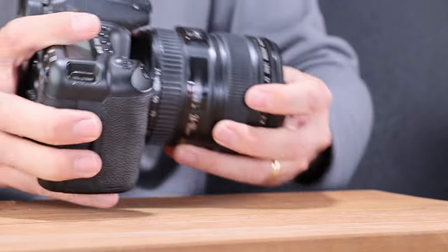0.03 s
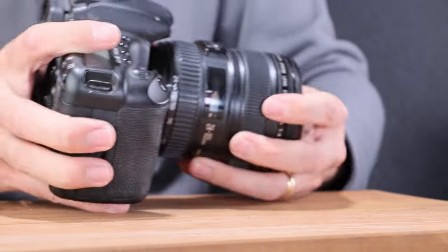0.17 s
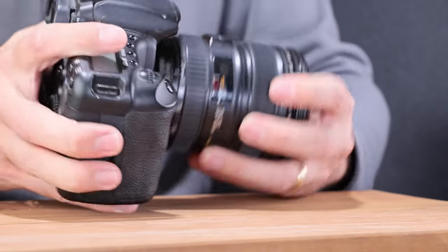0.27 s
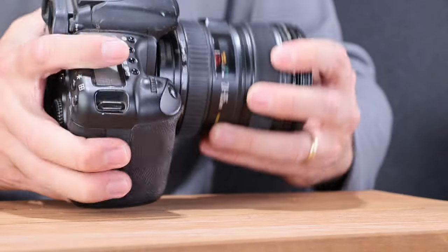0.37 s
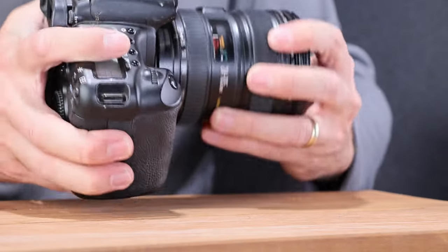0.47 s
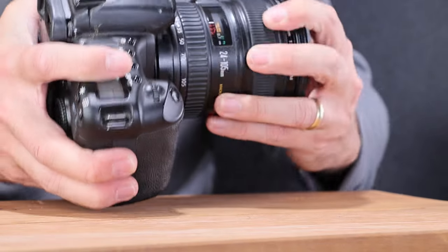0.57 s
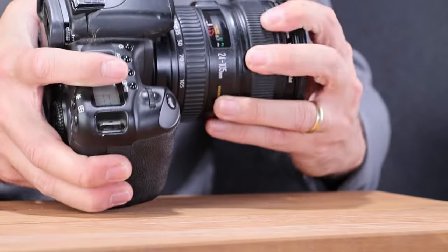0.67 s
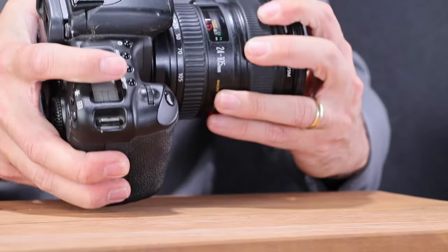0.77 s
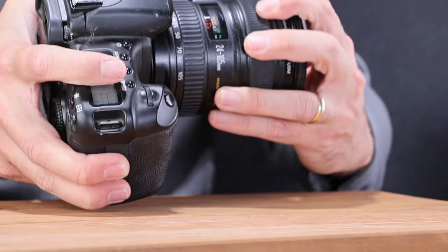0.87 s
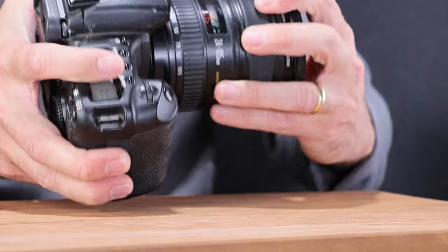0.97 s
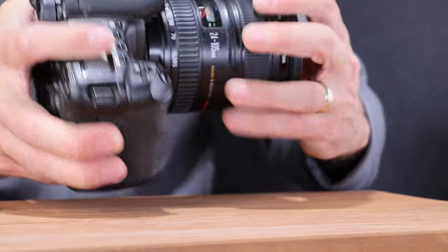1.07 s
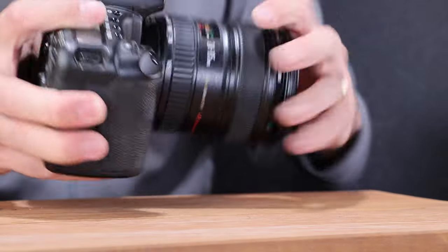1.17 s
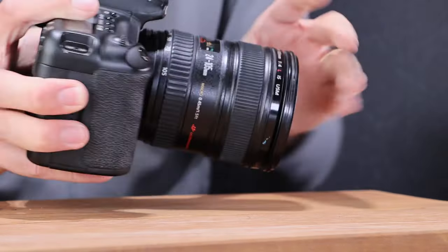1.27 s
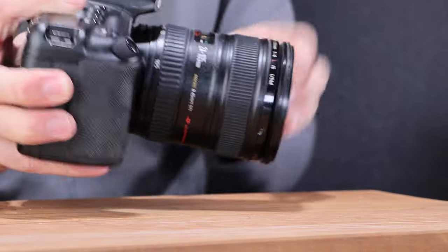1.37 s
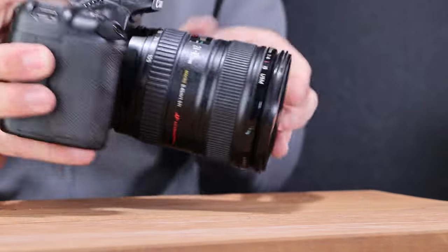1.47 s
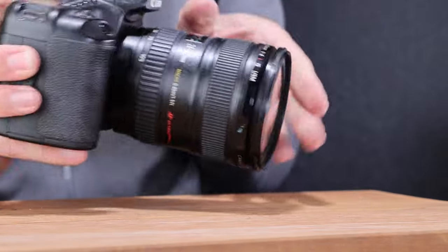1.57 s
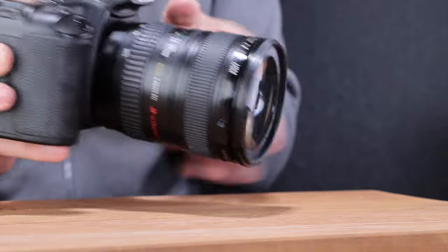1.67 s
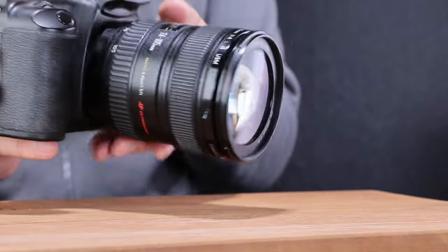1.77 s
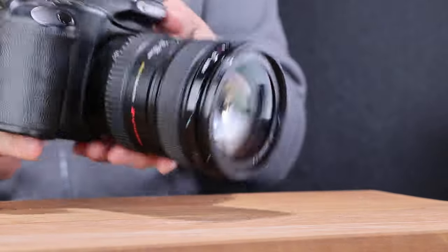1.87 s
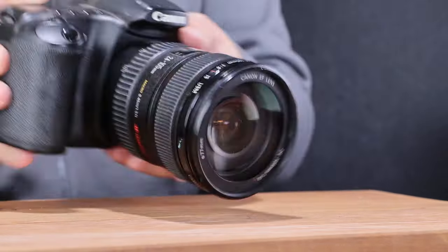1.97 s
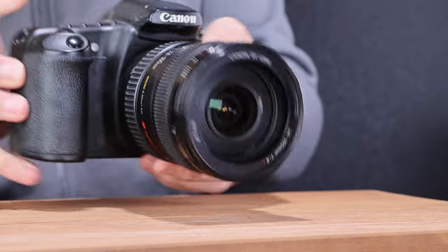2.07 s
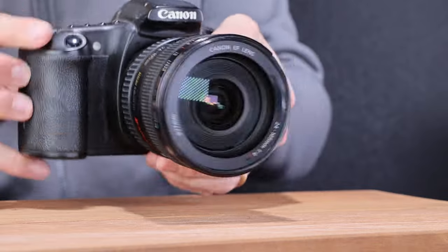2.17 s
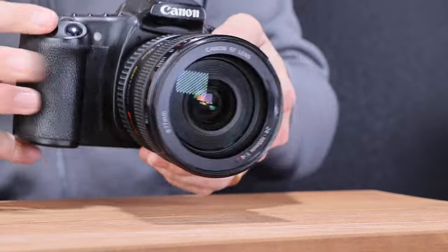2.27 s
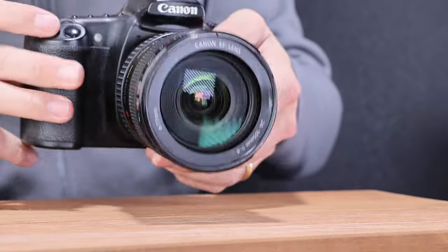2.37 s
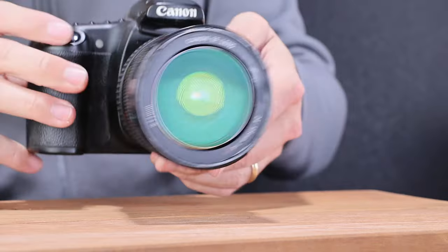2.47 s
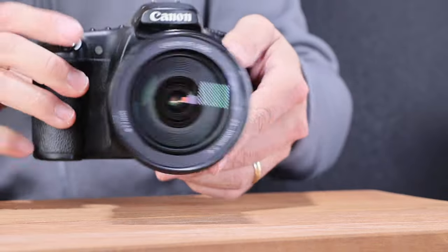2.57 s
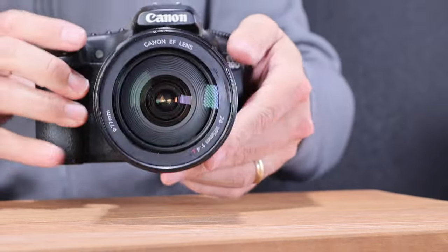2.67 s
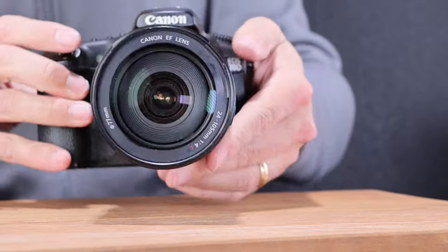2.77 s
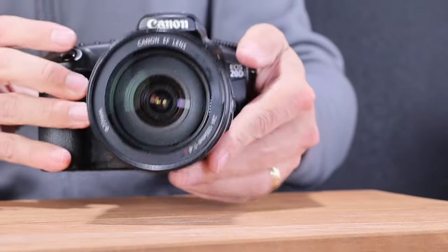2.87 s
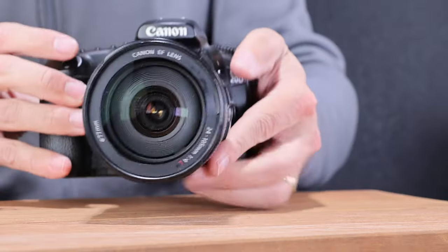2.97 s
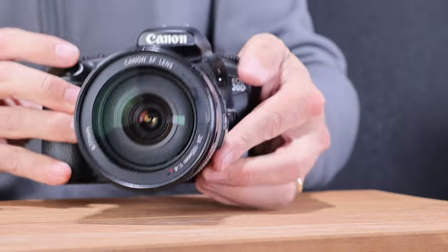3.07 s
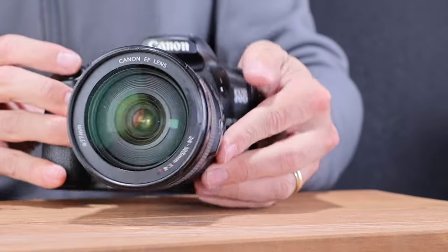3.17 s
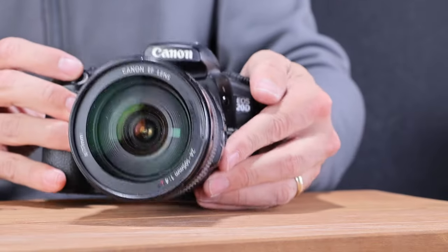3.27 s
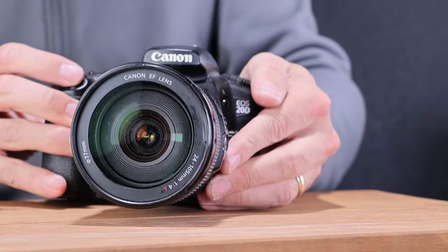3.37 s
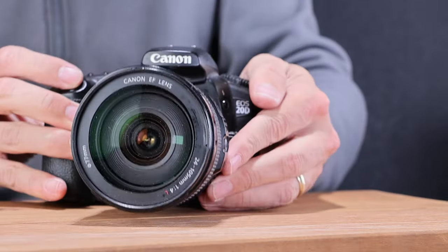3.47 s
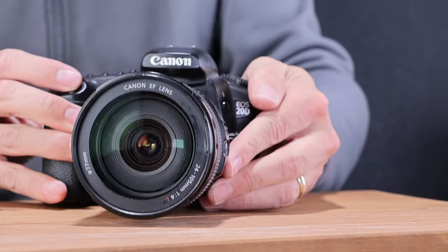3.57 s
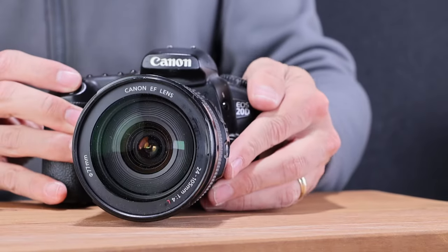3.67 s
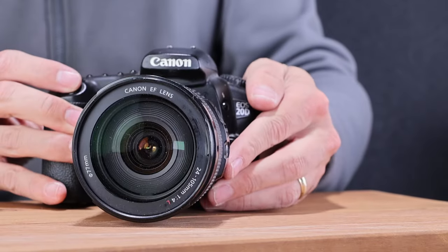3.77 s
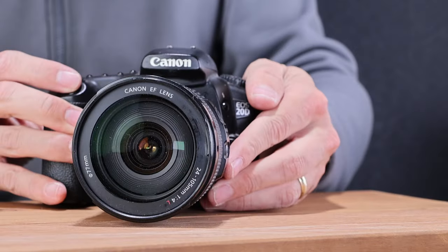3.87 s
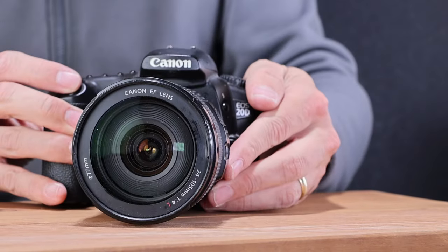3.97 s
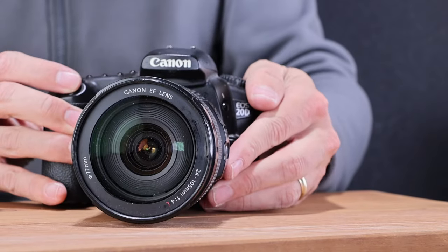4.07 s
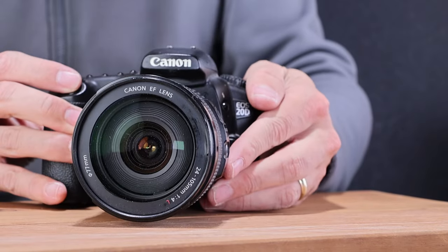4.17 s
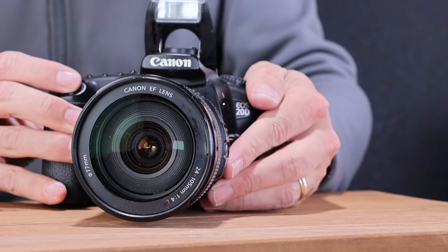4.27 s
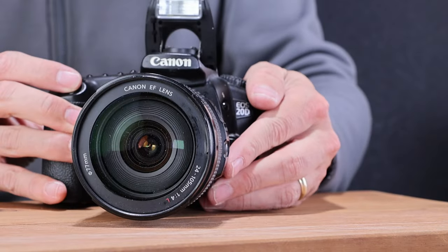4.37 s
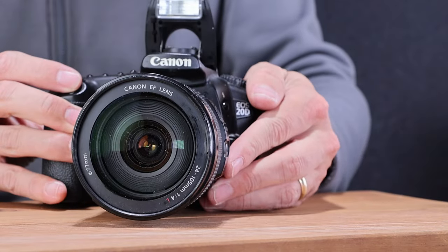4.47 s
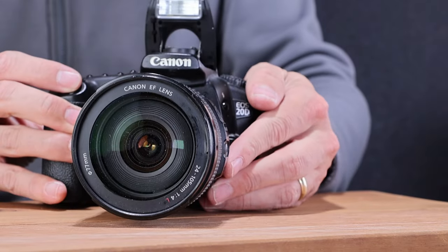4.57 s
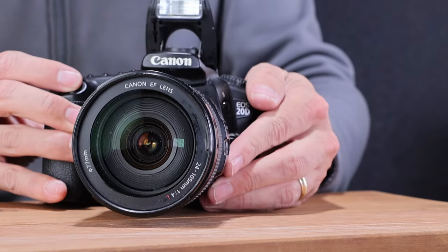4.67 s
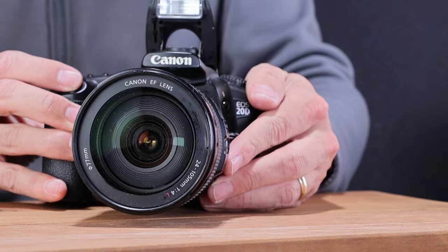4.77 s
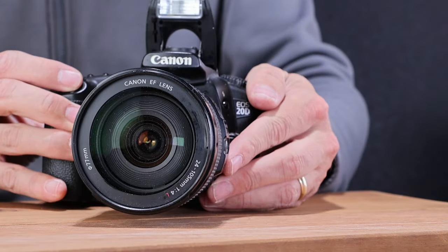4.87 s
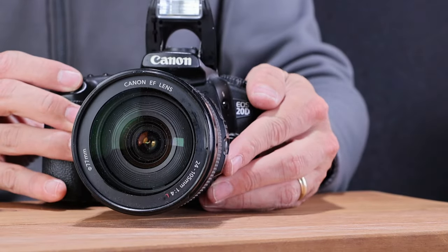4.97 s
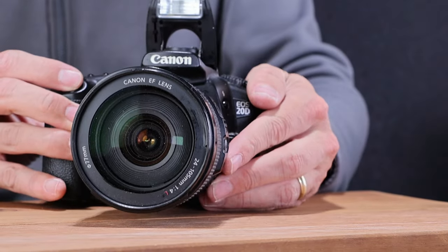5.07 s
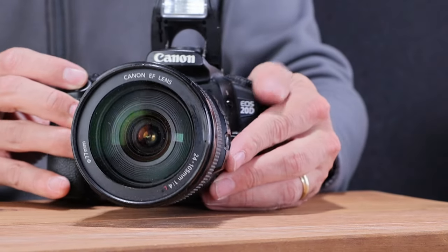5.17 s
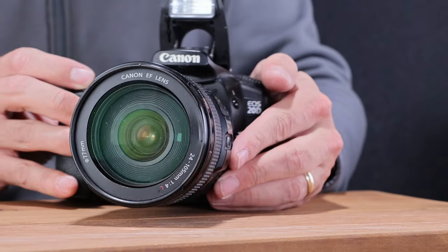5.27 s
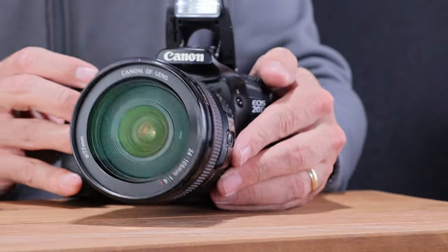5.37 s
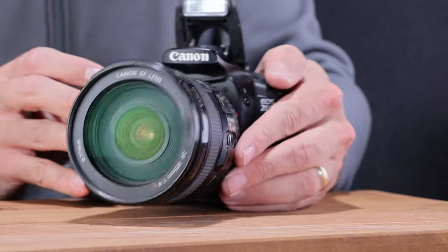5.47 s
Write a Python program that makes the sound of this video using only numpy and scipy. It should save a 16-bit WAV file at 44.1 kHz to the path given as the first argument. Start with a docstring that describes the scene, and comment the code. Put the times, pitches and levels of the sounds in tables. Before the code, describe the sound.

A lens knocks against a camera body right at the start, followed by faint ticks and rubbing as it is twisted. A soft bump comes at 0.8 seconds, and the lens locks with a crisp click at 0.9. From 1.3 to 2.5 seconds fingers rub and tick quietly on the casing, then two small, clearer clicks come around 2.7. At about 3.5 seconds the camera is set on a wooden table with two dull, low bumps. From 4.2 seconds a tiny geared motor whirrs with a thin whine, and at 4.4 the pop-up flash springs open with a sharp, briefly ringing snap, the loudest sound. A small tick follows near 4.9, then light rubbing and a soft bump around 5.4. Everything is close to the microphone in a small room with short reverberation and faint steady background noise.

```python
"""In a small room, close to a microphone, a zoom lens is twisted onto a camera until its pin snaps home.
Fingers rub by stick-slip friction and tick on the body, a switch clicks, and the camera is set down
on a wooden table, exciting low damped modes. A tiny geared motor then releases the pop-up flash,
which springs against its stop. Each impact is a brief force filtered by the resonances of the struck
part; near echoes, a short reverberation and steady room noise surround it all."""
import sys
import numpy as np
from scipy import signal
from scipy.fft import rfft, irfft
from scipy.io import wavfile
from scipy.ndimage import uniform_filter1d

SR = 44100
rng = np.random.default_rng(int(sys.argv[2]) if len(sys.argv) > 2 else 0)


def transcribe(signal):
    """Save signal, clipped to [-1, 1], as a 16-bit WAV file at the path in sys.argv[1]."""
    frames = np.atleast_2d(signal).T
    limited = np.clip(frames, -1, 1)
    pcm = np.round(limited * 32767).astype(np.int16)
    wavfile.write(sys.argv[1], SR, pcm)


N = 244112
LEAD, TAPS = 4410, 4096  # samples before t = 0, samples in an impulse response
HZ, T = np.fft.rfftfreq(TAPS, 1 / SR), np.arange(TAPS) / SR


def amp(db):
    """Amplitude ratio of a level in decibels."""
    return 10 ** (np.asarray(db) / 20)

def unit_rms(x):
    """Normalisation to unit mean power."""
    return x / np.sqrt(np.mean(x ** 2) + 1e-20)

def curve(points, hz):
    """Interpolation on a logarithmic frequency axis."""
    f, value = np.transpose(points)
    return np.interp(np.log(hz + 1), np.log(f + 1), value)

def peaks(resonances, hz):
    """Resonance: bell-shaped peaks on a dB spectrum."""
    return sum(db / (1 + (2 * (hz - f) / width) ** 2) for f, width, db in resonances)

def band_db(spectrum, bins):
    """Level of the power averaged over neighbouring bins."""
    return 10 * np.log10(abs(uniform_filter1d(abs(spectrum) ** 2, size=bins)) + 1e-12)

def part(hz, peak_db, cutoff_hz, octaves=.35):
    """A small part's broad resonance in dB, low-passed by the softness of the contact."""
    ring_db = peak_db / (1 + (np.log2((HZ + 1) / hz) / octaves) ** 2)
    return ring_db - np.minimum(10 * np.log10(1 + (HZ / cutoff_hz) ** 8), 70)

def add(mix, s, sound):
    """Superposition of a sound starting at s seconds."""
    span = mix[..., LEAD + round(s * SR):][..., :sound.shape[-1]]
    span += sound[..., :span.shape[-1]]

def ringing(db):
    """Minimum-phase impulse response of a dB spectrum."""
    log_gain = np.log(amp(np.r_[db, db[-2:0:-1]]))
    return np.fft.ifft(np.exp(np.conj(signal.hilbert(log_gain)))).real

def strike(db, chatter_s):
    """Impact excitation: decaying chatter rings a part. Rows: direct sound, all other directions."""
    blur = .74 * np.clip(HZ / 1500 - 1, 0, 1)  # summing over directions smooths the treble
    scattered_db = db + blur * (band_db(amp(db), 241) - db)
    rows = []
    for tone_db, decay_s, bins in (db, chatter_s, 55), (scattered_db, chatter_s + .002, 7):
        force = rfft(rng.standard_normal(TAPS) * np.exp(-T / decay_s))
        response = rfft(ringing(tone_db - band_db(force, bins)))
        rows.append(unit_rms(irfft(force * response)))
    return np.array(rows) * np.sqrt(.004 * SR / TAPS)  # the energy of 4 ms at unit rms

def grit(db, per_s, spread_db, size):
    """Shot noise: tiny random slips of uneven size ring a surface."""
    sizes = amp(spread_db * np.minimum(rng.exponential(1, size), 4))
    slips = sizes * rng.standard_normal(size) * (rng.random(size) < per_s / SR)
    return unit_rms(signal.oaconvolve(slips, ringing(db))[:size])


# Spectrum of the room's noise: f/Hz, level/dB
AIR = [(15, -54), (25, -14.5), (64, -8.5), (86, -18.5), (104, -9.5), (183, -7.5), (260, -7), (340, -11.5),
       (523, -9), (582, -4.5), (1240, -17.5), (1490, -18), (3830, -26.5), (6380, -27), (15500, -30.5)]
# Peaks in that noise: f/Hz, bandwidth/Hz, gain/dB
DRONE = [(217, 88, 3), (346, 64, 8.5), (673, 57, 3.5), (6200, 240, 4)]

def air():
    """Stationary noise: a low drone, coherent in both channels, and a faint hiss in antiphase."""
    hz = np.fft.rfftfreq(N, 1 / SR)
    gain = amp(curve(AIR, hz) + peaks(DRONE, hz))
    mid, side = unit_rms(irfft(rfft(rng.standard_normal((2, N))) * gain, N))
    side = amp(-21) * side + amp(-11) * rng.standard_normal(N)
    return amp(-62.5) * np.array([mid + side, mid - side])


# Reverberation time before the tail is tapered: f/Hz, T60/s
ROOM_T60 = [(150, 0.46), (400, 0.26), (1000, 0.35), (2800, 0.39), (7000, 0.37), (14000, 0.3)]
# Spectrum of the diffuse field: f/Hz, level/dB
ROOM_TONE = [(100, -0.5), (250, 1), (700, 0), (2000, 1), (5000, -3), (9000, -3.5), (15000, -5)]
# Reflections from table and walls: delay/s, relative level/dB
ECHOES = [(.0021, -19), (.0042, -11.5), (.0088, -26), (0.0097, -16), (0.0164, -17.5), (0.0216, -16.5)]

def room(x, wet_db, echo_db, build_s=.0027, side_db=-20):
    """Reflection and reverberation: row 0 arrives directly and by echoes, row 1 feeds a diffuse tail."""
    size = SR * 3 // 4
    hz, t, noise = signal.stft(rng.standard_normal((2, size)), SR, nperseg=256)
    decaying = noise * amp(-60 * t / curve(ROOM_T60, hz)[:, None])
    spectra = rfft(signal.istft(decaying, SR, nperseg=256)[1][:, :size])
    spectra /= np.sqrt(uniform_filter1d(abs(spectra) ** 2, size=61))  # evenly spread room modes
    tails = irfft(spectra * amp(curve(ROOM_TONE, np.fft.rfftfreq(size, 1 / SR))), size)
    tails *= 1 - np.exp(-np.arange(size) / SR / build_s)
    tails *= np.linspace(1, 0, size) ** 4
    tails /= np.linalg.norm(tails[0])
    mid, side = amp(wet_db) * signal.fftconvolve(x[1:], tails, axes=1)[:, :N + LEAD]
    mid += x[0]
    for delay, db in ECHOES:
        mid += amp(db + echo_db) * np.roll(x[0], round(delay * SR))
    return np.array([mid + amp(side_db) * side, mid - amp(side_db) * side])[:, LEAD:]


# Strokes of fingers and lens: t/s at the peak, swell/s, level/dB, resonance f/Hz
RUBS = [(.45, 0.07, -63, 4100), (.665, .052, -63, 3720), (1.535, .04, -60, 5830), (2.014, 0.039, -63, 5270),
        (2.063, .01, -55, 4900), (2.125, 0.067, -65.5, 5130), (2.66, 0.048, -70.5, 4800),
        (3.71, 0.022, -62.5, 668), (4.06, 0.037, -68.5, 3000), (5.38, 0.083, -68, 2800),
        (5.535, .03, -63, 2200)]
# Spectrum of the friction: f/Hz, level/dB
RUB_TONE = [(100, -35.5), (400, 5), (1200, 6), (2200, -2), (3500, -1.5), (6000, -2), (9000, -4.5),
            (12500, -0.5), (16000, -11)]

def rubs(catch_db=-3, ribs=8):
    """Stick-slip friction: skin and plastic slide, catching on ribs that each ring at their own pitch."""
    out, t = np.zeros(N + LEAD), np.arange(SR // 2) / SR - .25
    for s, swell_s, db, hz in RUBS:
        squeak_db = 3.5 + 17 * np.exp(-swell_s / .023)  # quick strokes ring out more
        tone_db = curve(RUB_TONE, HZ) + part(hz, squeak_db, cutoff_hz=2.25 * hz)
        slide = grit(tone_db, per_s=3500, spread_db=1.5, size=len(t))
        ribs_hz = hz * np.geomspace(.7, 1.6, ribs) * rng.uniform(.93, 1.1, ribs)
        catches = sum(grit(tone_db + peaks([(f, f / 6, 20)], HZ), per_s=90, spread_db=2, size=len(t))
                      for f in ribs_hz)
        stroke = unit_rms(slide + amp(catch_db) * unit_rms(catches))
        envelope = np.exp(-(t / np.where(t < 0, swell_s, 1.07 * swell_s)) ** 2)
        add(out, s + t[0], amp(db) * envelope * stroke)
    return out


# Response of the camera's shell: f/Hz, level/dB
SHELL = [(60, -30.5), (200, -10.5), (450, -1.5), (850, -3.5), (1100, -3.5), (1400, -2), (1750, -5.5),
         (2300, -4), (2800, -2.5), (3800, -4.5), (4500, -0.5), (6300, -2), (9500, -1), (16000, 0)]
# Narrow modes of the shell: f/Hz, bandwidth/Hz, gain/dB
SHELL_MODES = [(1050, 180, 4.5), (2210, 100, 4.5), (2720, 200, 1.5), (3490, 220, 4.5), (4580, 250, 1.5),
               (5200, 250, 0.5), (6200, 330, 2)]
# Response of the body's cavity: f/Hz, level/dB
CAVITY = [(150, -21), (380, -17.5), (560, -3.5), (680, 2), (900, -19.5), (1500, -28), (16000, -70)]
# Finger and switch clicks: t/s, level/dB, resonance f/Hz, cutoff f/Hz, chatter decay/s,
# cavity level/dB relative to the click
CLICKS = [(.158, -58, 5000, 11000, 0.0094, -35), (.245, -58.5, 3500, 9000, .005, -36),
          (0.4859, -50.5, 3900, 6940, 0.0023, -35), (.8, -46.5, 940, 3980, .002, -19),
          (1.2828, -52.5, 1660, 2280, .0024, -35), (1.4894, -49.5, 6660, 13200, .0017, -2.5),
          (1.5525, -53, 5200, 10000, 0.0025, -34), (1.777, -59.5, 3320, 9500, .0028, -30),
          (1.903, -56.5, 1900, 4000, .002, 3.5), (2.3938, -53, 2940, 4960, 0.00086, -35),
          (2.4597, -59, 5300, 7440, 0.0022, 4.5), (2.6871, -41, 6230, 8100, .0028, -4.5),
          (2.7423, -42.5, 2580, 7160, 0.0012, -11), (3.732, -50, 3260, 10500, .003, -11),
          (4.9474, -47.5, 5060, 6220, .0004, -40), (5.3639, -56, 3630, 7050, 0.0058, -29)]

def clicks():
    """Structural and cavity resonance: each click rings its own part, the shell and the hollow body."""
    out, shell_db = np.zeros((2, N + LEAD)), curve(SHELL, HZ) + peaks(SHELL_MODES, HZ)
    for s, db, hz, cutoff_hz, chatter_s, cavity_db in CLICKS:
        cavity = amp(cavity_db) * strike(curve(CAVITY, HZ), chatter_s=.0047)
        shell = strike(shell_db + part(hz, 8, cutoff_hz), chatter_s)
        add(out, s, amp(db) * (shell + cavity))
    return out


# Soft blows through table and body: t/s, level/dB, mean f/Hz
BUMPS = [(.807, -37.5, 145), (2.186, -49, 141), (3.4584, -33.5, 195), (3.58, -37, 178), (5.414, -48.5, 179)]
# Modes of a blow: frequency ratio, relative level/dB
WOOD_MODES = [(.55, -17), (1, 1.5), (1.4, -6.5), (2.3, -18.5)]

def bumps(rock_s=.028, loss_db=4, detune=.11, contacts=3, rise_s=.0013):
    """Damped modal vibration: the camera lands with a dull tap and rocks to rest, weaker each contact."""
    out, t = np.zeros(N + LEAD), np.arange(SR // 2) / SR
    decay_db = -60 * t / .072  # at frequency ratio 1; higher modes die sooner
    for s, db, hz in BUMPS:
        tap = strike(curve(SHELL, HZ) + part(310, 20, 760), chatter_s=.002)[0]
        add(out, s, amp(db - 12.5) * tap)
        for contact, pitch in enumerate(hz * (1 + detune * rng.standard_normal(contacts))):
            modes = sum(amp(mode_db + decay_db * np.sqrt(ratio)) * np.sin(2 * np.pi * pitch * ratio * t)
                        for ratio, mode_db in WOOD_MODES)
            add(out, s + contact * rock_s, amp(db - contact * loss_db) * modes * (1 - np.exp(-t / rise_s)))
    radiation = signal.butter(2, 75, "highpass", fs=SR, output="sos")  # little deep bass is radiated
    return signal.sosfilt(radiation, out)


# Spectrum of the gear noise: f/Hz, level/dB
GEARS = [(120, -37.5), (200, -3.5), (350, -14.5), (397, -35.5), (671, -3), (1040, -5), (1130, -6.5),
         (1540, 1), (2020, -13.5), (2550, 0), (3230, -5), (4010, -2.5), (5070, -7), (10500, -16),
         (15000, -31.5)]
# Resonances of gear housing and hinge: f/Hz, bandwidth/Hz, gain/dB
HOUSING = [(1270, 120, 8.5), (2541, 110, 3.5), (2800, 110, 4.5), (4800, 200, 4.5), (7300, 250, 3.5),
           (9250, 400, 4.5), (11900, 500, 7)]

def motor(whine_hz=3950, waver=.0027, tooth_hz=566, tooth_depth=.42):
    """Amplitude modulation by meshing teeth: a whirr with a thin whine, surging at each change of load."""
    start_s, load_s, release_s = 4.16, 4.2425, 4.3432  # runs free, cam loads the catch, arm swings
    stop_s = ARM_IMPACTS[0][0]
    t = (np.arange(N + LEAD) - LEAD) / SR
    ticks, effort = np.zeros((2, N + LEAD)), np.zeros(N + LEAD)
    for start, end, db in (start_s, load_s, -61), (load_s, release_s, -54), (release_s, stop_s, -51.5):
        stage = (t >= start) & (t < end)
        surge_db = 9 * np.exp(-(t[stage] - start) / .024)
        effort[stage] = amp(db + surge_db)
        add(ticks, start, amp(db + 5.5) * strike(curve(SHELL, HZ) + part(9000, 2, 11000), chatter_s=.005))
    speed = 1 + waver * unit_rms(uniform_filter1d(rng.standard_normal(N + LEAD), size=300))
    phase_per_hz = 2 * np.pi * np.cumsum(speed) / SR
    whine = unit_rms(np.sin(whine_hz * phase_per_hz) + amp(-23) * np.sin(3 * whine_hz * phase_per_hz))
    whine *= np.clip((t - 4.214) / .006, 0, 1)
    whine *= amp(-420.5 * np.maximum(t - release_s, 0))  # fades once the catch lets go
    gears = grit(curve(GEARS, HZ) + peaks(HOUSING, HZ), per_s=4000, spread_db=1, size=N + LEAD)
    whirr = effort * gears * (1 + tooth_depth * np.sin(tooth_hz * phase_per_hz))
    return ticks + whirr + amp([[-53.5], [-66]]) * whine  # the whine beams toward the microphone


# Response of the lens knocking on the body: f/Hz, level/dB
KNOCK = [(35, -56.5), (60, -34), (187, -5), (394, -6.5), (475, -4.5), (756, 0), (869, -5), (1350, -3.5),
         (1590, -12), (2590, -11), (2910, -12.5), (3580, -7.5), (5710, -11), (13200, -21), (15500, -36)]
# Modes of that knock: f/Hz, bandwidth/Hz, gain/dB
KNOCK_MODES = [(85, 46, 8), (318, 54, 8), (1105, 55, 0), (3480, 210, 4.5)]
# Response of the lens mount to its pin: f/Hz, level/dB
MOUNT = [(150, -29), (400, -10), (600, -7.5), (950, -16), (1400, -9.5), (1850, -21), (3100, -3),
         (3700, -9.5), (4300, 3), (5700, -0.5), (7500, -14), (10500, -11), (12500, -19), (16000, -17)]

def lens():
    """Impact excitation: the lens knocks on the body; later its sprung pin snaps home and rattles."""
    out = np.zeros((2, N + LEAD))
    add(out, -.02, amp(-17.5) * strike(curve(KNOCK, HZ) + peaks(KNOCK_MODES, HZ), chatter_s=.0046))
    add(out, .9213, amp(-29.5) * strike(curve(MOUNT, HZ), chatter_s=.00097))
    add(out, .9227, amp(-38.5) * strike(curve(SHELL, HZ) + part(3700, 6.2, 8600), chatter_s=.0028))
    return out


# Response of the flash arm on its stop: f/Hz, level/dB
ARM = [(200, -33), (900, -23.5), (1500, -10), (2100, -16), (2750, -2), (3250, 3.5), (3950, -13.5),
       (4800, 1), (5500, -5.5), (6250, 2.5), (7700, -7), (9500, -18.5), (11200, -13.5), (16000, -30.5)]
# Response of the whole jolted camera: f/Hz, level/dB
JOLT = [(80, -22.5), (190, 5.5), (300, 0), (430, -6.5), (550, -10), (690, 9), (900, -7), (1300, -0.5),
        (1900, -13), (3400, -13.5), (5000, -7.5), (7100, -10), (10000, -9.5), (16000, -32)]
# Lingering modes of camera and flash spring: f/Hz, level/dB, T60/s
SPRING_MODES = [(171, -40.5, 0.21), (235, -39, 0.17), (670, -46.5, .22), (4763, -45, 0.22),
                (9600, -48, 0.2)]
# Contacts of the arm with its stop: t/s, level/dB, chatter decay/s
ARM_IMPACTS = [(4.4025, -21, 0.00021), (4.4030, -21, 0.00026), (4.4032, -24.5, 0.00044),
               (4.4061, -30, 0.0025)]

def flash(rebound_s=4.4126, jolt_s=4.4135):
    """Impact and free vibration: the sprung arm hits its stop, rebounds and leaves the camera ringing."""
    out, t = np.zeros((2, N + LEAD)), np.arange(SR // 2) / SR
    for s, db, chatter_s in ARM_IMPACTS:
        add(out, s, amp(db) * strike(curve(ARM, HZ), chatter_s))
    add(out, rebound_s, amp(-29.5) * strike(curve(SHELL, HZ) + part(7200, 20, 11000), chatter_s=.00045))
    add(out, jolt_s, amp(-25.5) * strike(curve(JOLT, HZ), chatter_s=.012))
    onset = 1 - np.exp(-t / .004)
    for hz, db, t60 in SPRING_MODES:
        add(out, jolt_s, amp(db - 60 * t / t60) * np.sin(2 * np.pi * hz * t) * onset)
    return out


def scene():
    """Superposition: each source with its share of the room's reflections, over the steady noise."""
    fingers = room(clicks() + rubs(), wet_db=-5.5, echo_db=-.5)
    table = room(np.tile(bumps(), (2, 1)), wet_db=-11, echo_db=-5.5)
    mount = room(lens(), wet_db=-5, echo_db=-4)
    pop_up = room(flash() + motor(), wet_db=-5, echo_db=-2.5)
    return fingers + table + mount + pop_up + air()

def record(dry, cutoff_hz=15900):
    """Linear-phase band limiting, with a slight level difference in favour of the right channel."""
    low_pass = signal.firwin(511, cutoff_hz, window=("kaiser", 9), fs=SR)
    return signal.oaconvolve(dry * amp([[-.1], [.1]]), low_pass[None], "same")


dry = scene()
out = record(dry)
transcribe(out)
```